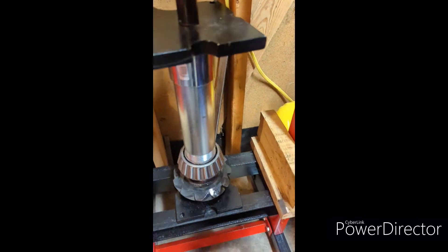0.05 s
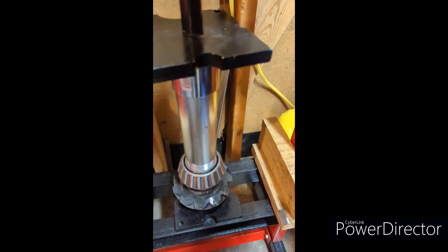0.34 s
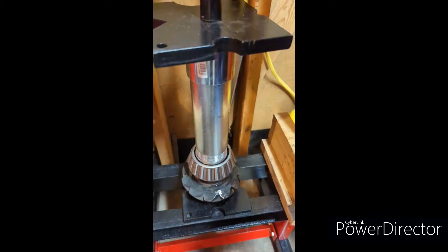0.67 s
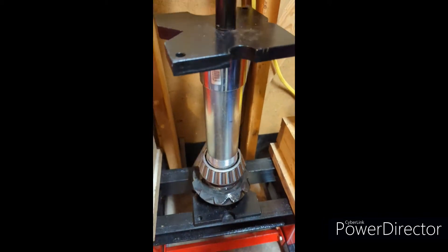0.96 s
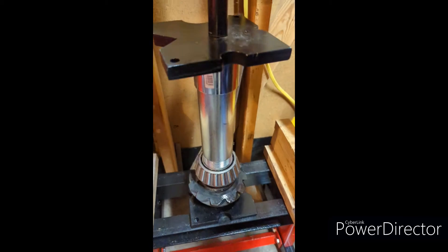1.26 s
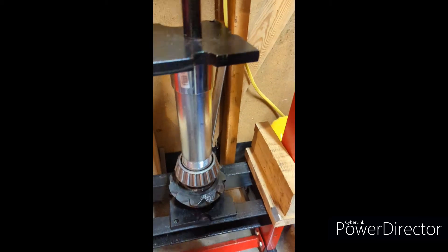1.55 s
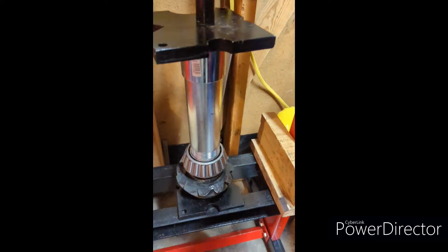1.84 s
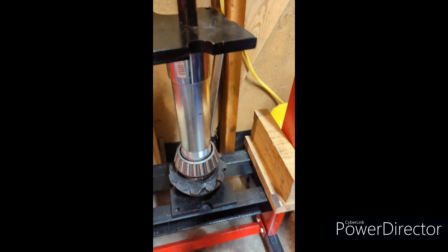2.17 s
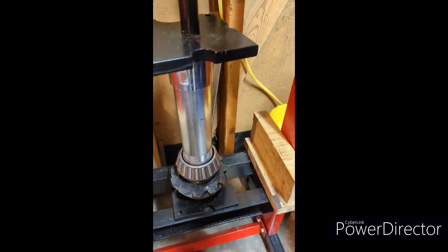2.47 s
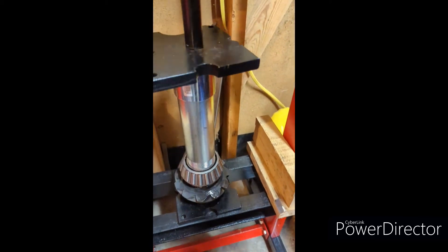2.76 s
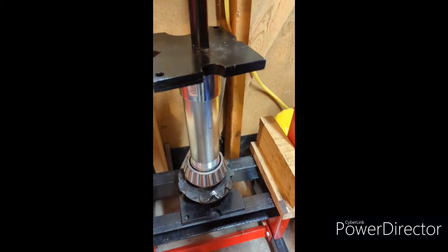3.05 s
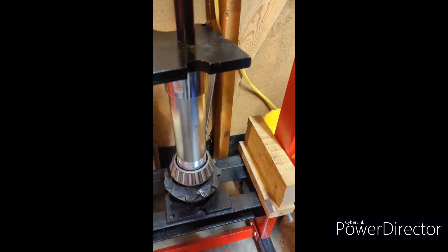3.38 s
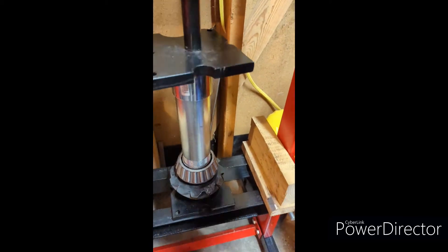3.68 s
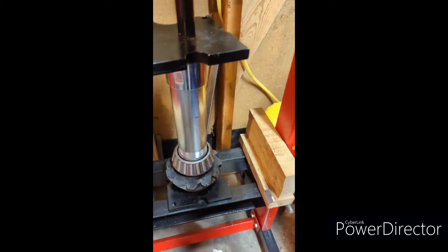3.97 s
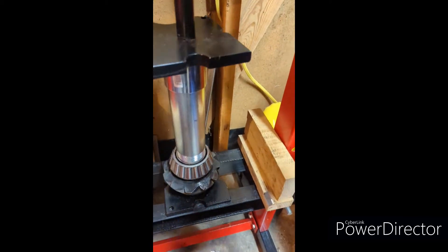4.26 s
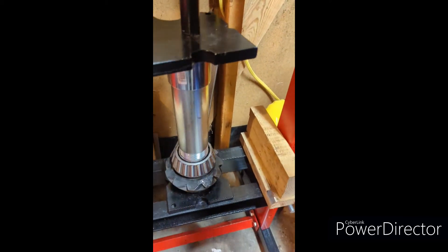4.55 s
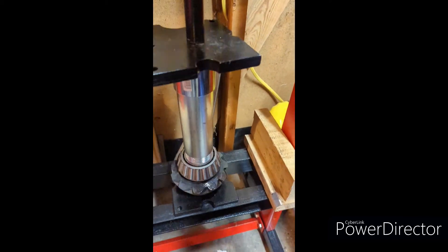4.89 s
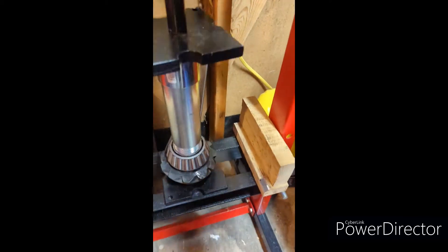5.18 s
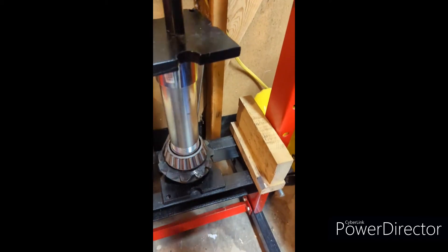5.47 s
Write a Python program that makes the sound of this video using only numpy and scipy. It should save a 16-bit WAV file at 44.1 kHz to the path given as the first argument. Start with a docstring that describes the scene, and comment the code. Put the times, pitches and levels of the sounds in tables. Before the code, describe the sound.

A hydraulic shop press is pumped from the very start, close to the microphone and slightly to the right, in a small workshop with little echo. The strokes come at about four a second, quickening to just over five by 1.5 seconds. Each is a tight cluster of sharp valve spits, a handle rattle, a piston knock and a linkage clank that briefly rings the steel frame. Loose pins tick faintly and oil snaps through the valves. Tiny, very high seal squeaks appear mostly between 1.5 and 3.3 seconds. From about 4 seconds the spits become stronger. At about 5.4 seconds a heavy double clunk ends the pumping, and loose steel judders and rings briefly. Behind everything lie soft hiss, faint wavering whines and a faint hum that swells late on. As the pumping stops, the hiss drops and a quiet low rumble enters.

```python
"""A hydraulic shop press, close by in a small workshop, its strokes coming about five a second. On each stroke
the valves spit, the handle rattles in its socket, the piston knocks home and the linkage clanks; the steel
contacts ring the frame. Oil snaps past the valve seats, loose pins tick and the piston seal squeaks now and
then. A heavy double clunk ends the run and leaves loose steel juddering. Behind it lies a bed of hiss, faint
hum and thin whines, with a low rumble at the end."""
import sys
import numpy as np
from scipy import signal
from scipy.fft import rfft, irfft, next_fast_len
from scipy.io import wavfile
from scipy.ndimage import uniform_filter1d

SR = 44100
rng = np.random.default_rng(int(sys.argv[2]) if len(sys.argv) > 2 else 0)


def dump(signal):
    """Clip the signal to [-1, 1] and save it as 16-bit WAV at the path in sys.argv[1]."""
    limited = np.clip(np.atleast_2d(signal).T, -1, 1)
    pcm = np.round(limited * 32767).astype(np.int16)
    wavfile.write(sys.argv[1], SR, pcm)


N = 252379
TIME = np.arange(N) / SR
RING = np.arange(SR // 2) / SR  # time axis of the ring-outs

# pump strokes: rattle t/s, knock t/s, clank t/s, return spit t/s, return spit level/dB
STROKE_CUES = [(0.000, 0.043, 0.075, 0.153, -3), (0.233, 0.305, 0.339, 0.419, -2),
               (0.493, 0.55, 0.574, 0.652, -3), (0.73, 0.776, 0.802, 0.877, -0.5),
               (0.957, 0.997, 1.022, 1.091, 0.5), (1.169, 1.207, 1.230, 1.295, -14),
               (1.37, 1.399, 1.419, 1.486, -2), (1.559, 1.583, 1.610, 1.675, -4),
               (1.749, 1.771, 1.800, 1.858, -3), (1.93, 1.963, 1.985, 2.039, -4),
               (2.107, 2.141, 2.163, 2.222, -8), (2.284, 2.321, 2.344, 2.392, -8.5),
               (2.465, 2.496, 2.514, 2.566, -2.5), (2.634, 2.662, 2.679, 2.742, -7),
               (2.809, 2.839, 2.859, 2.921, -4.5), (2.989, 3.019, 3.043, 3.103, -3),
               (3.164, 3.195, 3.222, 3.276, -6), (3.342, 3.373, 3.404, 3.458, -3),
               (3.515, 3.559, 3.582, 3.636, -1), (3.702, 3.742, 3.767, 3.822, -5),
               (3.884, 3.931, 3.955, 4.009, 3.5), (4.074, 4.121, 4.136, 4.195, 3),
               (4.25, 4.298, 4.317, 4.374, 1), (4.438, 4.485, 4.504, 4.561, 3.5),
               (4.621, 4.668, 4.689, 4.744, 1), (4.809, 4.850, 4.877, 4.927, 3),
               (4.997, 5.03, 5.054, 5.114, 5), (5.176, 5.211, 5.239, 5.309, 3.5)]
# tone colour of each kind of contact: f/Hz, level/dB
SPIT_EQ = [(100, -68), (280, -42), (500, -17.5), (1100, -10.5), (2200, -1.5), (3500, 3), (5800, 7.5),
           (7200, -1), (9500, 1.5), (12000, 2), (15500, -4.5)]
RATTLE_EQ = [(100, -24), (300, -37), (520, -13), (1050, -39.5), (1700, -8), (2400, -3), (4000, 0.5),
             (5800, 3), (7200, -9), (11000, 1), (15500, -7.5)]
KNOCK_EQ = [(60, -39), (130, -29), (230, -33.5), (340, -15), (700, -12), (1080, -15), (1280, 4.5),
            (1560, 8), (2000, 0), (3000, 12), (5500, -0.5), (7500, -3.5), (15500, -60)]
CLANK_EQ = [(60, -66), (130, -9.5), (230, -22.5), (360, -15), (1080, -12), (1280, -7.5), (1580, -5),
            (2100, -8), (3400, -1.5), (4900, 7), (7200, -5.5), (9500, -9.5), (10900, 3), (12000, -21),
            (15500, -15)]
CLUNK_EQ = [(60, -45), (220, -8), (350, -28), (900, 1.5), (2300, -3), (3200, -4.5), (5200, 1), (7000, -4.5),
            (11000, -3), (15500, 0)]
JUDDER_EQ = [(100, -45), (550, -32), (900, -4), (1250, 0.5), (1800, 0.5), (2500, 2.5), (2800, -10),
             (3800, -13), (6000, -24), (15000, -27)]
# modes of the press frame: f/Hz, level/dB
FRAME_MODES = [(505, -47), (1265, -37.5), (1550, -43), (1846, -40), (2661, -38.5), (2835, -33), (2882, -61),
               (3090, -32.5), (3252, -36), (3575, -33), (3752, -37), (4535, -31.5), (4600, -40.5),
               (4650, -32.5), (4800, -32), (5006, -31), (5120, -34), (5710, -34.5), (6202, -44)]
# oil snaps after the intake, the clank and the return: delay/s, level/dB
SNAP_CUES = [(0.0052, -8.5), (0.0016, -13.5), (0.0019, -18.5)]
# seal squeaks: t/s, level/dB, f/Hz, length/s
SQUEAK_CUES = [(1.51, -15, 13500, 0.0087), (1.884, -10.5, 14500, 0.015), (2.239, -8, 15500, 0.0039),
               (2.4194, -4, 13600, 0.0052), (2.595, -8, 14200, .01), (2.766, -14, 14800, 0.024),
               (2.945, -5, 13640, 0.01), (3.117, -7.5, 13800, 0.012), (3.29, -8.5, 13500, 0.019),
               (4.214, -8.5, 10780, .007), (5.391, -19.5, 8880, 0.011), (5.391, -18.5, 4440, 0.021)]
# closing blows: t/s, bright level/dB, body level/dB
CLUNK_CUES = [(5.4461, -11.5, -13.5), (5.474, -11, -16.5)]
# judders of the loose steel: t/s, level/dB
JUDDER_CUES = [(5.487, 10), (5.499, 4.5), (5.515, 3), (5.530, -2)]
# modes of the loose steel: f/Hz, level/dB, t60/s
STEEL_MODES = [(199.3, -11.5, 0.62), (780, -2, 0.24), (840, -16, .3), (920, 0, 0.28), (1114, -15, 0.74),
               (1436, 2, 0.28), (1806, -6.5, 0.48), (1870, -1, 0.52), (2230, -10, .16), (2406, 10.5, 0.24),
               (5300, -4, .11)]
# tone colour of the two noise beds: f/Hz, level/dB
HISS_EQ = [(30, -26), (70, -64), (125, -1), (180, -7), (300, -4), (520, -1.5), (850, 3), (1080, -3),
           (1500, -2.5), (3000, 10), (6000, -0.5), (15000, -6)]
RUMBLE_EQ = [(30, 2), (60, -3), (130, -9), (200, 8), (290, -4), (560, 0), (1000, 1), (1900, -3),
             (3000, -20), (8000, -40)]
# fader curve of the hum: t/s, level/dB
HUM_FADER = [(0, -60), (3, -59), (4.5, -53), (5.3, -52), (5.7, -58)]
# background whines: t/s, length/s, first f/Hz, last f/Hz, level/dB
WHINE_CUES = [(0.117, 0.12, 985, 846, -46), (.33, 0.22, 854, 946, -37.5), (0.35, 1, 1493, 1516, -44.5),
              (1.023, .17, 1180, 1155, -41.5), (1.339, 0.24, 942, 837, -39), (2.86, 0.088, 1533, 1560, -38),
              (4.153, 0.078, 1400, 1500, -37), (4.366, 0.33, 1496, 1577, -43)]
# base reverb time of the workshop: f/Hz, t60/s
SHOP_DECAY = [(120, 0.39), (500, 0.25), (1400, 0.15), (4000, 0.15), (8000, 0.12), (15000, 0.078)]
# pan of the press: f/Hz, left minus right level/dB
PRESS_PAN = [(400, 0), (1300, -2), (2400, -4.5), (4400, -6), (8000, -3), (15000, -5)]

RATTLE_S, KNOCK_S, CLANK_S, RETURN_S, RETURN_DB = np.transpose(STROKE_CUES)
INTAKE_S = RATTLE_S - .011  # the valve spits just before the handle takes the load
LOOSE = np.exp(-RATTLE_S / 1.2)  # the first strokes are loose, then the arm settles
CUSHION_DB = 0.88 * RATTLE_S  # building oil pressure takes weight off the knock and the clank
SCATTER_DB = 1.24  # no two contacts are equally strong


def undb(db):
    """Decibels to gain."""
    return 10 ** (np.asarray(db) / 20)


def at(points, hz):
    """Read (f/Hz, value) points on a log-frequency axis."""
    f, value = np.transpose(points)
    return np.interp(np.log(np.maximum(hz, 1)), np.log(f), value)


def unit(x):
    """Scale to a mean energy of 1 per channel."""
    return x / np.sqrt(np.mean(np.sum(x ** 2, axis=-1)))


def wander(size):
    """Random values every size samples, joined by straight lines."""
    knots = N // size + 2
    return np.interp(np.arange(N) / size, np.arange(knots), rng.standard_normal(knots))


def tone(hz):
    """A sine that follows a pitch curve."""
    return np.sin(2 * np.pi * np.cumsum(hz) / SR)


def passband(x, kind, hz, order):
    """High-pass or low-pass filter."""
    return signal.sosfilt(signal.butter(order, hz, kind, fs=SR, output="sos"), x)


def through(x, response):
    """Play a sound through an impulse response."""
    return signal.fftconvolve(np.atleast_2d(x), response, axes=-1)[:, :x.shape[-1]]


def tint(x, eq, size=4096):
    """Minimum-phase EQ from (f/Hz, level/dB) points."""
    cepstrum = irfft(at(eq, np.fft.rfftfreq(size, 1 / SR)) * np.log(10) / 20)
    cepstrum[1:size // 2] *= 2
    cepstrum[size // 2 + 1:] = 0
    return through(x, irfft(np.exp(rfft(cepstrum)))[None])


def bands(size, alike_hz=1300):
    """Half-octave bands of white stereo noise, narrow in the bass and wide in the treble."""
    padded = next_fast_len(size, True)
    f = np.maximum(np.fft.rfftfreq(padded, 1 / SR), 1)
    for hz in 31.25 * 2 ** np.arange(0, 9.5, .5):
        shape = np.cos(np.pi / 2 * np.clip(2 * np.log2(f / hz), -1, 1))
        mid, side = irfft(rfft(rng.standard_normal((2, padded))) * shape, padded)[:, :size]
        alike = .85 / (1 + (hz / alike_hz) ** 4)
        yield hz, np.sqrt(1 + alike) * mid + np.sqrt(1 - alike) * np.array([side, -side])


def shop(linger, direct_db=-1, right_lag_s=.00005):
    """Direct sound, then dense reflections off steel and walls; linger scales the reverb time."""
    tail = 0
    for hz, noise in bands(len(RING)):
        fade = undb(-60 * RING / (linger * at(SHOP_DECAY, hz)))
        tail = tail + unit(noise * fade) * np.sqrt(hz)
    path = unit(tail)
    path[0, 0] += undb(direct_db)
    path[1, int(right_lag_s * SR)] += undb(direct_db)
    return unit(path)


def ring(modes):
    """Ring-out of (f/Hz, level/dB, t60/s) modes, each with its own phase left and right."""
    phases = rng.uniform(0, 2 * np.pi, (len(modes), 2, 1))
    return unit(sum(undb(db - 60 * RING / t60) * np.sin(2 * np.pi * hz * RING + phase)
                    for (hz, db, t60), phase in zip(modes, phases)))


def blows(when, bright_db, body_db, trim_db=0):
    """Cues of (t/s, bright level/dB, body level/dB), each a little different in strength."""
    db = trim_db + SCATTER_DB * rng.standard_normal(len(when))
    return np.column_stack([when, bright_db + db, body_db + db])


def contacts(cues, chatter_s, grit, impact=0.32, lag_s=0., size=2048):
    """Contact force: one impact, then a dying chatter of tiny ones; one track per level column."""
    t = np.arange(size) / SR
    click = impact * unit(np.exp(-t / .00002))
    force = np.zeros((len(cues[0]) - 1, N + size))
    for s, *levels in cues:
        sign, strength = rng.standard_normal((2, size))
        grains = np.sign(sign) * np.exp(grit * np.minimum(strength, 2.5))
        chatter = unit(grains * np.sqrt(t) * np.exp(-t / chatter_s))
        burst = unit(chatter + click)
        for track, db in enumerate(levels):
            start = max(int((s + track * lag_s) * SR), 0)  # the body may answer later
            force[track, start:start + size] += undb(db) * burst
    return force[:, :N]


def radiate(force, eq, split_hz, high_db, low_db, linger, direct_db=-1):
    """A contact in the room: its bright edge sounds above the crossover, its body below."""
    path = tint(shop(linger, direct_db), eq)
    bright = through(force[0], unit(passband(path, "high", split_hz, order=3)))
    body = through(force[1], unit(passband(path, "low", split_hz, order=3)))
    return undb(high_db) * bright + undb(low_db) * body


def valve_spits():
    """The valves spit on the intake and again on the return."""
    intakes = blows(INTAKE_S, bright_db=-11, body_db=-19.5, trim_db=-2)
    returns = blows(RETURN_S, bright_db=-11, body_db=-19.5, trim_db=RETURN_DB)
    force = contacts(np.vstack([intakes, returns]), chatter_s=.0033, grit=1.96, impact=.22, lag_s=.002)
    return radiate(force, SPIT_EQ, split_hz=7230, high_db=16, low_db=24, linger=1)


def handle_rattle(bounce_s=.027):
    """The handle rattles in its socket and bounces once; gives the sound and the force on the frame."""
    hits = blows(RATTLE_S, bright_db=-7.5, body_db=-12.5 - 5 * LOOSE)
    bounces = blows(RATTLE_S + bounce_s, bright_db=-7.5, body_db=-12.5, trim_db=-12.5)
    force = contacts(np.vstack([hits, bounces]), chatter_s=.0082, grit=2.26, impact=.18, lag_s=.00102)
    return radiate(force, RATTLE_EQ, split_hz=7100, high_db=9, low_db=27.5, linger=.56), force[1]


def frame_ring(force, t60_s=.2):
    """Steel-on-steel contacts set the press frame ringing."""
    return through(force, ring([(hz, db, t60_s) for hz, db in FRAME_MODES]))


def noise_bed(eq, db, flicker_db):
    """Background noise whose bands flicker independently."""
    bed = sum(noise * undb(at(eq, hz) + flicker_db * wander(2400)) for hz, noise in bands(N))
    return bed * undb(db) / bed.std()


def loose_pins(db=-6, spread_db=5, count=170, until_s=5.4):
    """Pins and springs tick faintly at random while the handle moves."""
    when, strength = rng.random((count, 2)).T
    cues = np.column_stack([when * until_s, db + spread_db * (2 * strength - 1)])
    force = contacts(cues, chatter_s=.00086, grit=5.3)
    return through(force, unit(tint(shop(linger=.49), SPIT_EQ)))


def piston_knock():
    """The piston knocks home, heavier on loose strokes; gives the sound and the force on the frame."""
    hits = blows(KNOCK_S, bright_db=-8.5, body_db=-19.5 + 6 * LOOSE - CUSHION_DB)
    force = contacts(hits, chatter_s=.0043, grit=1.3, impact=.34)
    return radiate(force, KNOCK_EQ, split_hz=1160, high_db=17.5, low_db=25.5, linger=.62), force[1]


def linkage_clank(slack_s=.009):
    """The linkage thuds, then rings once its slack is taken up; gives sound and force on the frame."""
    _, link_db, thud_db = blows(CLANK_S, bright_db=-6.5, body_db=-22.5 + 6.5 * LOOSE - CUSHION_DB).T
    taut_s = CLANK_S + slack_s * LOOSE
    link = contacts(np.column_stack([taut_s, link_db]), chatter_s=.0052, grit=2.01, impact=.41)[0]
    thud = contacts(np.column_stack([CLANK_S, thud_db]), chatter_s=.0039, grit=2.3, impact=.74)[0]
    return radiate((link, thud), CLANK_EQ, split_hz=2550, high_db=19.5, low_db=27, linger=.51), link


def oil_snaps(length_s=.00116, first_hz=14500, last_hz=9500, size=512):
    """Oil snaps past a valve seat: a tiny, rough chirp that dives through the treble."""
    age = np.arange(size) / SR / length_s
    swell = np.e * age * np.exp(-age - age ** 2 / 4)
    dive_hz = last_hz + (first_hz - last_hz) * np.exp(-age ** 2 / 2)
    out = np.zeros(N + size)
    for times, (delay_s, db) in zip((INTAKE_S, CLANK_S, RETURN_S), SNAP_CUES):
        for s in times[times > 0]:
            jitter = rng.standard_normal(size)
            pitch = dive_hz * (1 + .0522 * jitter[0] + .25 * jitter)
            start = int((s + delay_s) * SR)
            out[start:start + size] += undb(db + SCATTER_DB * jitter[1]) * swell * tone(pitch)
    thin = passband(out[:N], "high", 3000, order=2)
    return through(thin, shop(linger=.5, direct_db=0, right_lag_s=.0002))


def hum_and_whines(hum_hz=503, waver=.01444, flutter_db=4):
    """A faint hum swells late in the run; thin whines glide and waver in and out."""
    hum_db = np.interp(TIME, *np.transpose(HUM_FADER)) + flutter_db * wander(3000)
    out = undb(hum_db) * tone(hum_hz * (1 + waver * wander(500)))
    for s, length_s, first_hz, last_hz, db in WHINE_CUES:
        progress = np.clip((TIME - s) / length_s, 0, 1)
        pitch = (first_hz + (last_hz - first_hz) * progress) * (1 + waver * wander(300))
        swell = np.sqrt(4 * progress * (1 - progress))
        out += undb(db + flutter_db * wander(400)) * swell * tone(pitch)
    return through(out, shop(linger=.82, direct_db=-5.5))


def seal_squeaks(fall=.038, rough=.12, size=2048):
    """The piston seal sticks and slips: a short, rough, falling whistle."""
    out = np.zeros(N + size)
    for s, db, hz, length_s in SQUEAK_CUES:
        age = np.arange(size) / SR / length_s
        waver = uniform_filter1d(rng.standard_normal(size), size=16)
        pitch = hz * (1 + fall * (.5 - np.minimum(age, 2)) + rough * waver)
        swell = (1 - np.exp(-20 * age)) * np.exp(-age ** 2)
        start = int(s * SR)
        out[start:start + size] += undb(db) * swell * tone(pitch)
    return through(out[:N], shop(linger=.5, direct_db=-13.5, right_lag_s=.0002))


def closing_clunk():
    """Two heavy blows, after which loose steel judders and rings out."""
    blow = contacts(CLUNK_CUES, chatter_s=.0037, grit=1.6)
    judder = contacts(JUDDER_CUES, chatter_s=.011, grit=1.45)
    clunk = radiate(blow, CLUNK_EQ, split_hz=2700, high_db=25, low_db=26.5, linger=.69, direct_db=-4.5)
    clatter = through(judder, unit(tint(shop(linger=.89, direct_db=-15), JUDDER_EQ)))
    return clunk + undb(6) * clatter + undb(6.5) * through(judder, ring(STEEL_MODES))


def scene():
    """The press sits a little to the right; as the pumping stops, the hiss ducks and a rumble enters."""
    rattle, rattle_force = handle_rattle()
    knock, knock_force = piston_knock()
    clank, clank_force = linkage_clank()
    frame = frame_ring(undb(18) * rattle_force + undb(15) * knock_force + undb(17) * clank_force)
    press = valve_spits() + rattle + knock + clank + frame
    press += loose_pins() + oil_snaps() + seal_squeaks() + closing_clunk()
    left = tint(press[0], [(hz, db / 2) for hz, db in PRESS_PAN])
    right = tint(press[1], [(hz, -db / 2) for hz, db in PRESS_PAN])
    stopped = np.interp(TIME, [5.35, 5.38], [0, 1])
    hiss = undb(-10 * stopped) * noise_bed(HISS_EQ, db=-33.5, flicker_db=5)
    rumble = stopped * noise_bed(RUMBLE_EQ, db=-37.5, flicker_db=1.5)
    return np.vstack([left, right]) + hum_and_whines() + hiss + rumble


def record(dry):
    """The microphone thins the deep bass, rounds the loudest peaks and cuts the top."""
    rounded = np.tanh(passband(dry, "high", 70, order=2))
    return signal.sosfilt(signal.ellip(10, .2, 80, 15900, fs=SR, output="sos"), rounded)


dry = scene()
out = record(dry)
dump(out)
```